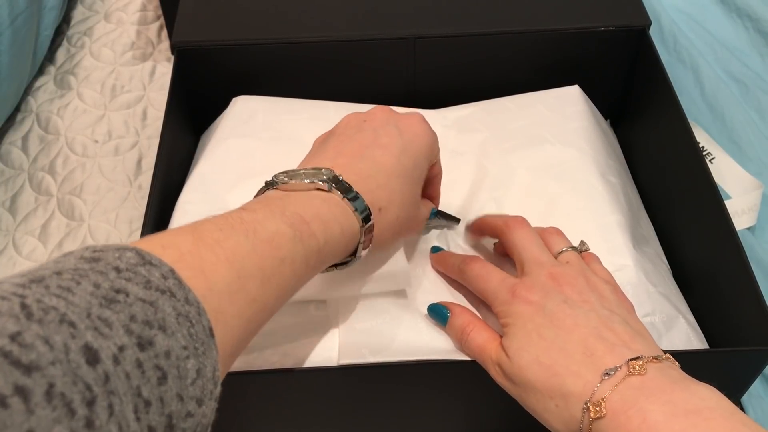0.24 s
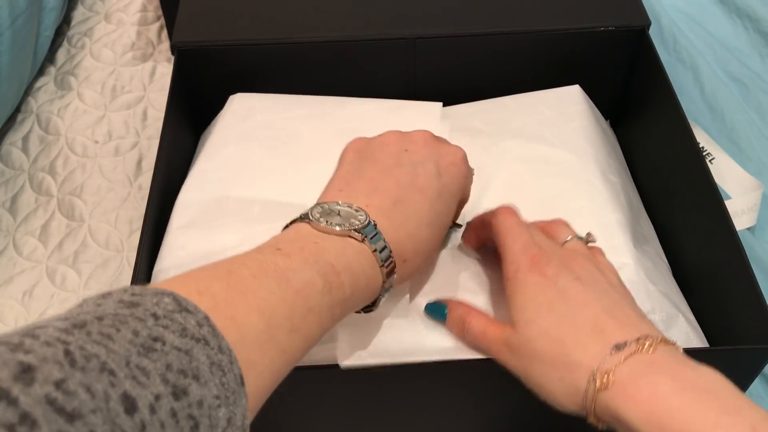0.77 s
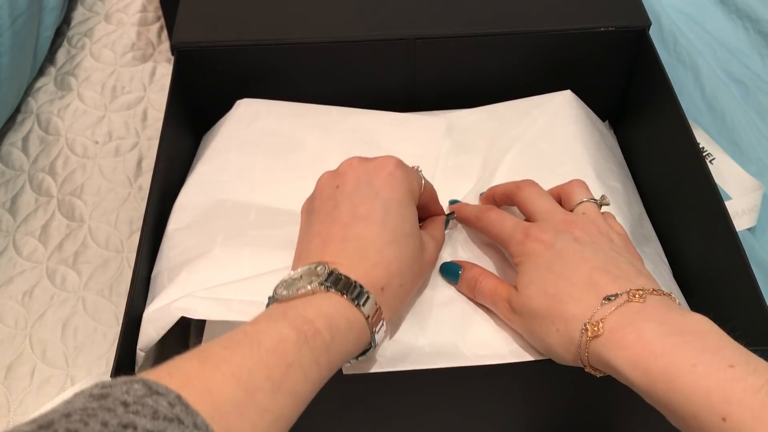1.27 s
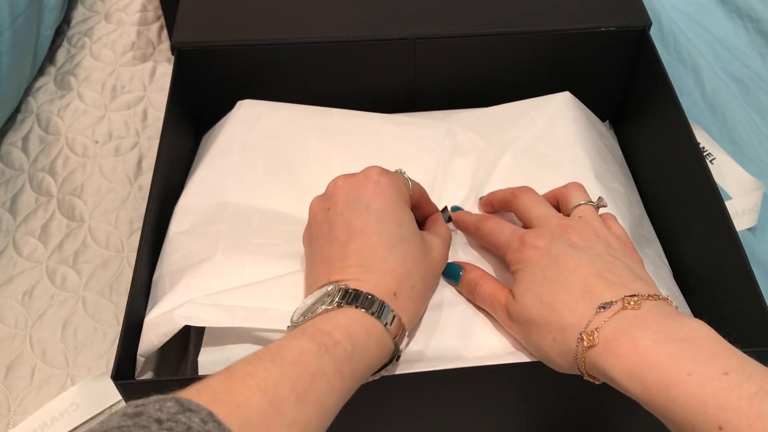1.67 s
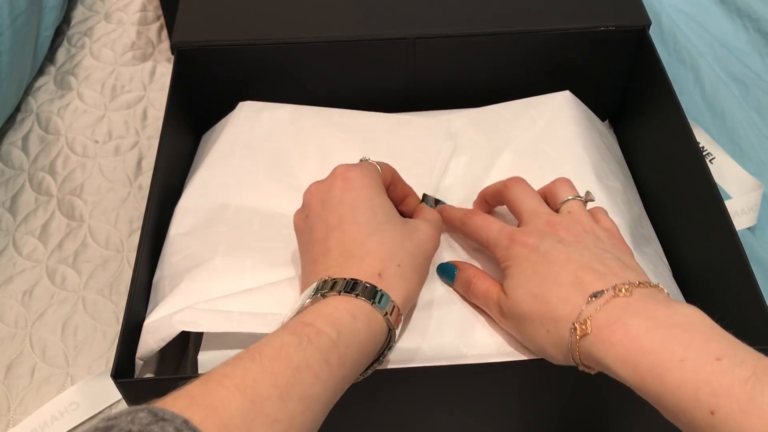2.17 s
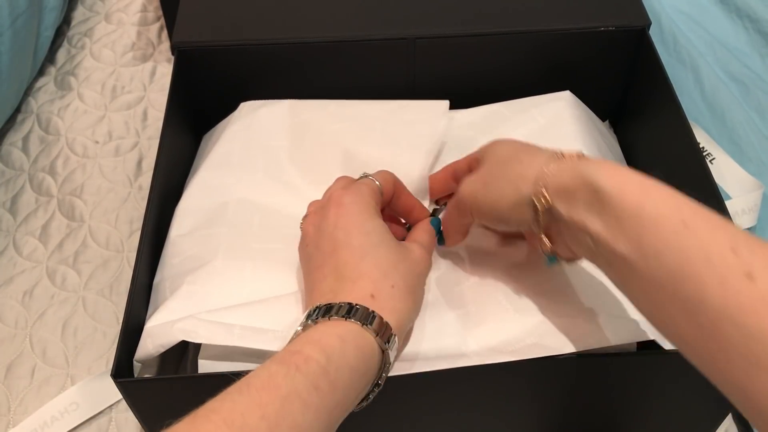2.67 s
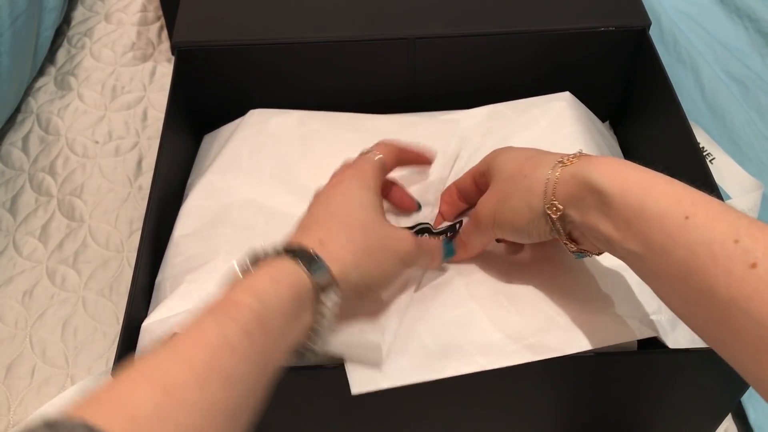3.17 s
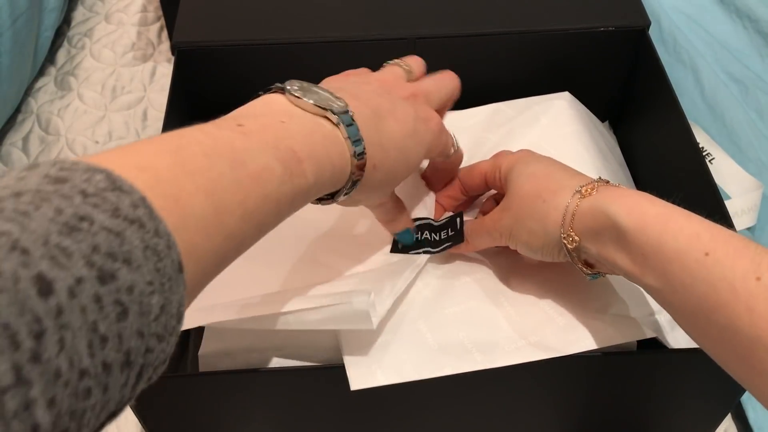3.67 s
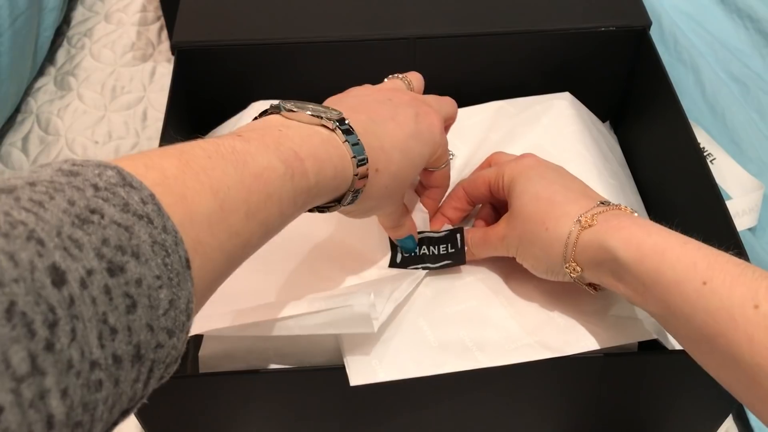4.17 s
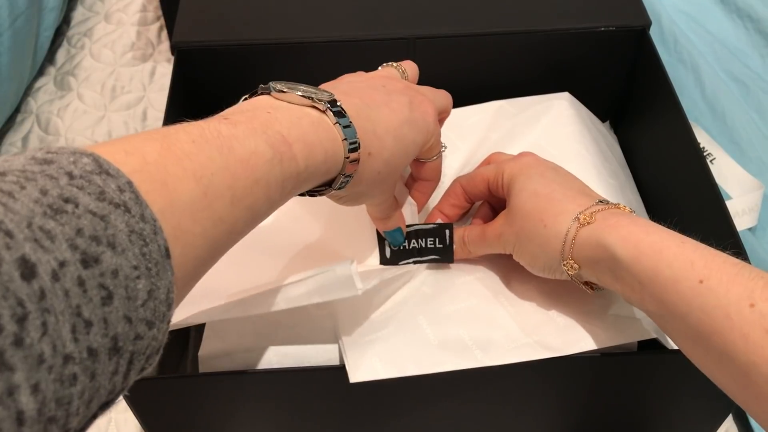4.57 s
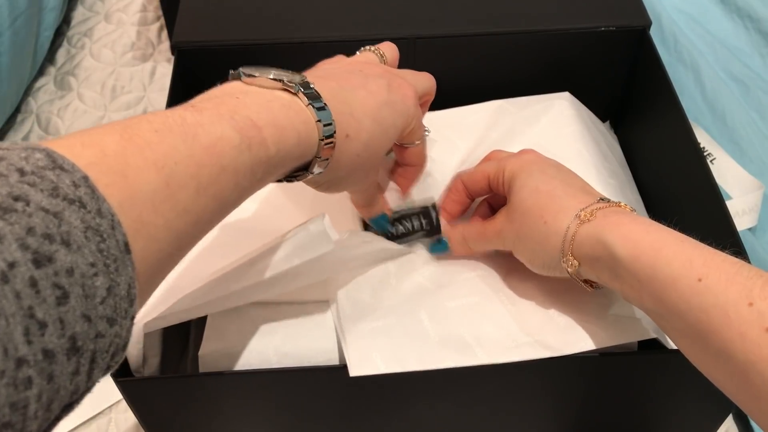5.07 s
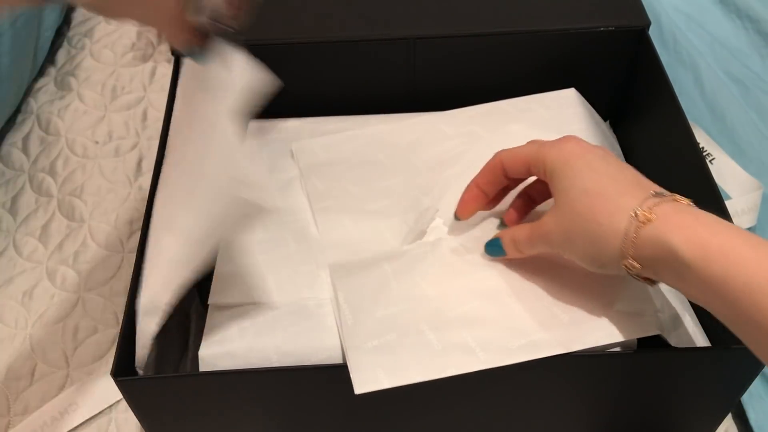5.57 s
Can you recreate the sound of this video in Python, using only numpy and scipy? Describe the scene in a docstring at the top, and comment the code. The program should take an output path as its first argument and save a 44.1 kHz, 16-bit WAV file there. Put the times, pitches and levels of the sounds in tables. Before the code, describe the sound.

Hands pick at a sticker on tissue paper: irregular crisp crinkles, tiny ticks and louder snaps over a faint papery slide. Soft dull nudges sound the box underneath. Activity rises and falls, thins around four and a half seconds, then swells in a quick peel and fold, with a faint low sinking hum at the end. Close microphone, soft small room, low air noise.

```python
"""Thin tissue paper crackles as hands peel a sticker off it in a cardboard box and fold the sheet back.
Small creases are thousands of tiny noise puffs over a smooth slide; large ones are loud snaps,
some short and sharp, some longer like several creases close together.
Soft pushes on the box are longer puffs that ring the cardboard, and a low sine sinks at the end.
Faint coloured noise is the air of the soft room, and short tails of fading noise are its echo."""
import sys
import numpy as np
from scipy import signal
from scipy.fft import rfft, irfft, next_fast_len
from scipy.io import wavfile
from scipy.ndimage import uniform_filter1d, map_coordinates

SR = 44100
rng = np.random.default_rng(int(sys.argv[2]) if len(sys.argv) > 2 else 0)


def unload_audio(sound):
    """Save the sound as a 16-bit wav file, at the path given as the first command line argument."""
    columns = np.transpose(np.atleast_2d(sound))
    # keep every value between -1 and 1, then stretch to whole-number steps
    steps = np.round(np.clip(columns, -1, 1) * 32767)
    wavfile.write(sys.argv[1], SR, steps.astype(np.int16))


N = 257103

# tone colour of the crisp part of the paper sound: f/Hz, relative level/dB
CRISP_COLOUR = [(1500, -20.5), (2500, -14.5), (3000, -4.5), (4200, -1), (4850, -7.5), (5350, 0),
                (6100, 0.5), (7700, -2.5), (8600, 0), (10400, -5.5), (12700, -0.5), (13900, -5),
                (17500, -4.5)]
# tone colour of the dull part, from larger folds: f/Hz, relative level/dB
DULL_COLOUR = [(60, -29.5), (250, -5), (420, -8), (700, -13), (1000, -4), (1500, -1.5), (2400, -1),
               (3200, -5.5), (5000, -14)]


def amp(db):
    """Turn decibels into a plain amplitude factor."""
    return 10 ** (np.asarray(db) / 20)


def unit(x):
    """Scale a sound to an average strength (rms) of 1."""
    return x / np.sqrt(np.mean(x ** 2) + 1e-20)


def along(points, hz):
    """Read a curve of (Hz, value) points, joined by straight lines on a log pitch axis."""
    f, value = np.transpose(points)
    return np.interp(np.log(hz + 1), np.log(f + 1), value)


def curves(rows):
    """Draw each column after the time as a curve with one value per sample."""
    times, *columns = np.transpose(rows)
    t = np.arange(N) / SR
    return [np.interp(t, times, column) for column in columns]


def wobble(rate):
    """A smooth random curve through `rate` random points a second."""
    knots = rng.standard_normal(int(N * rate / SR) + 4)
    return map_coordinates(knots, [np.arange(N) * rate / SR])


def filtered(x, response):
    """Multiply the spectrum of x by a response that depends on frequency."""
    size = next_fast_len(N + SR // 2)
    spectrum = rfft(x, size) * response(np.fft.rfftfreq(size, 1 / SR))
    return irfft(spectrum, size)[..., :N]


def coloured(x, points, size=2048):
    """Give x a tone colour with a filter that never sounds early; white noise keeps its power."""
    level = amp(along(points, np.fft.rfftfreq(size, 1 / SR)))
    # folding the cepstrum (the transform of the log spectrum) puts the filter's energy at its start
    cepstrum = irfft(np.log(level + 1e-3))
    cepstrum[1:size // 2] *= 2
    cepstrum[size // 2 + 1:] = 0
    pulse = irfft(np.exp(rfft(cepstrum)))
    return signal.fftconvolve(x, pulse / np.linalg.norm(pulse))[:N]


def bursts(times, gains, swell_s, ring_hz, ring_db, size):
    """Each burst is a puff of noise that swells, dies and favours the pitch of its own spot."""
    u = np.arange(size) / SR / swell_s[:, None]
    puff = rng.standard_normal(u.shape) * u * np.exp(-u)
    f, centre = np.fft.rfftfreq(size, 1 / SR), ring_hz[:, None]
    ring = 1j * f * 0.19 * centre / (centre ** 2 - f ** 2 + 1j * f * 0.25 * centre)
    puff = irfft(rfft(puff) * (1 + amp(ring_db) * ring), size)
    puff *= (gains / np.linalg.norm(puff, axis=1))[:, None]
    at = np.round(times * SR).astype(int)[:, None] + np.arange(size)
    return np.bincount(at.ravel(), puff.ravel(), N + SR)[:N]  # add up overlapping puffs


def handling():
    """Crisp and dull crackle levels: a steady rustle plus tugs that swell, hold and let go."""
    # the sheet's rustle between tugs: t/s, crisp level/dB, dull level against crisp/dB
    rustle = [(0.0, -37.5, -9.5), (0.19, -58.5, -5), (0.29, -51, -6), (0.56, -42, -12), (0.7, -51.5, -9.5),
              (0.8, -44.5, -9), (1.0, -44, -8), (1.28, -48, -7.5), (1.6, -44, -7.5), (1.85, -50, -5),
              (2.05, -66, -14), (2.45, -45, -4), (3.05, -44, -8), (3.68, -47, -4), (4.0, -47.5, -4),
              (4.5, -46, -6), (4.56, -56, -6), (4.68, -54.5, -6), (4.85, -50.5, -10), (5.1, -51, -17),
              (5.36, -45.5, -6.5), (5.83, -50, -12)]
    # hand tugs: t of full strength/s, time held/s, crisp level/dB, dull level against crisp/dB
    tugs = [(0.054, 0.03, -26.5, -11), (0.33, 0.017, -40.5, -7.5), (0.419, 0.057, -41.5, -9),
            (0.6, 0.012, -41, -8), (0.875, 0.014, -43, -8), (1.025, 0.041, -30, -10.5),
            (1.1, 0.023, -37.5, -8.5), (1.17, 0.047, -41.5, -9.5), (1.48, 0.047, -47, -10),
            (1.947, 0.015, -30.5, -10.5), (2.092, 0.091, -38, -12), (2.229, 0.14, -40, -8.5),
            (2.55, 0.018, -35, -9.5), (2.6, 0.22, -39.5, -6.5), (2.96, 0.03, -39.5, -5.5),
            (3.12, 0.098, -36, -6), (3.311, 0.057, -38.5, -7.5), (3.489, 0.016, -39, -6.5),
            (3.732, 0.11, -41, -2.5), (4.05, 0.013, -34.5, -6.5), (4.72, 0.062, -43.5, -7),
            (4.929, 0.0034, -44.5, -9), (4.98, 0.051, -47, -8), (5.174, 0.035, -29.5, -8.5),
            (5.278, 0.0059, -34, -8), (5.39, 0.065, -38, -8.5), (5.58, 0.045, -45, -9.5),
            (5.77, 0.046, -47.5, -14)]
    rise_db_per_s, fall_db_per_s = 468, 298
    t = np.arange(N) / SR
    rest_db, share_db = curves(rustle)
    crisp_power = amp(rest_db) ** 2
    dull_power = amp(rest_db + share_db) ** 2
    for full_s, held_s, db, tug_share_db in tugs:
        before_s = np.clip(full_s - t, 0, 1)
        after_s = np.clip(t - full_s - held_s, 0, 1)
        below_db = rise_db_per_s * before_s + fall_db_per_s * after_s
        power = amp(db - below_db) ** 2
        crisp_power = crisp_power + power
        dull_power = dull_power + amp(tug_share_db) ** 2 * power
    return np.sqrt(crisp_power), np.sqrt(dull_power)


def steady(x, seconds):
    """Even out the strength of x to about 1 over each short stretch, as if fed by a steady hand."""
    power = uniform_filter1d(x ** 2, int(seconds * SR))
    return x / np.sqrt(np.abs(power) + 1e-9)


def crackle(count=6000):
    """Many small creases buckle in clumps, unequal in size, pitch and length, as sheet slides on sheet."""
    # smooth slide against crackle, before clumping and a lift of the dull part: t/s, level/dB
    sliding = [(0, -4), (1.3, -3.5), (4.1, -7), (5.12, -16), (5.2, 0.5)]
    top_from_hz, bright_db, top_fade_power = 7500, -40.5, 0.35
    crisp_gain, dull_gain = handling()

    when, size, life, tilt, pitch = rng.random((count, 5)).T
    times = when * (N - 1) / SR
    clump_db = 3 * wobble(30) + 3 * wobble(110)
    # many small creases, few large ones
    size_db = clump_db[(times * SR).astype(int)] - 3.06 * np.log(1.006 - size)
    tilt_db = 12 * (tilt - 0.5)  # makes each crease more crisp or more dull
    swell_s = 0.00022 + 0.00053 * life ** 2
    crisp_hz, dull_hz = 3300 * 4.5 ** pitch, 900 * 3.5 ** pitch
    crisp = bursts(times, amp(size_db - tilt_db), swell_s, crisp_hz, ring_db=9, size=320)
    dull = bursts(times, amp(size_db + tilt_db), swell_s + 0.00047, dull_hz, ring_db=6.5, size=480)

    slide_gain = amp(curves(sliding)[0] + 0.41 * clump_db)
    crisp_slide, dull_slide = slide_gain * rng.standard_normal((2, N))
    crisp = steady(coloured(unit(crisp) + crisp_slide, CRISP_COLOUR), 0.067)
    dull = steady(coloured(unit(dull) + 1.7 * dull_slide, DULL_COLOUR), 0.05)

    # crackle softer than bright_db loses its top faster than its level
    top = filtered(crisp, lambda hz: 1 / (1 + (top_from_hz / (hz + 1)) ** 4))
    top_kept = np.minimum(crisp_gain / amp(bright_db), 1) ** top_fade_power
    crisp = crisp - top * (1 - top_kept)
    return crisp_gain * crisp + dull_gain * dull


def air():
    """The quiet room: coloured noise with a slightly unsteady level."""
    # tone colour of the room's air: f/Hz, relative level/dB
    air_colour = [(24, -34), (45, 0.5), (250, -2), (450, -8.5), (800, -11.5), (3000, -18.5), (17000, -59)]
    level = amp(-61 + 2.2 * wobble(9.8))
    return level * coloured(rng.standard_normal(N), air_colour)


def room(x, size=SR // 4):
    """Bedding and walls answer briefly, treble dying first; each quarter second gets a new random echo."""
    # how long the echo takes to fall by 60 dB: f/Hz, time/s
    decay = [(300, 0.25), (3000, 0.16), (15000, 0.02)]
    delay = 120  # samples before the echo starts
    out = np.zeros(N + 2 * SR)
    for start in range(0, N, size):
        hz, t, noise = signal.stft(rng.standard_normal(SR // 3), SR, nperseg=256)
        fade = amp(-60 * t / along(decay, hz)[:, None])
        tail = signal.istft(noise * fade, SR, nperseg=256)[1]
        answer = signal.fftconvolve(x[start:start + size], tail / np.linalg.norm(tail))
        out[start + delay:][:len(answer)] += answer
    return out[:N]


def box():
    """Fingers and sheet push softly on the box: puffs of noise ring the cardboard briefly."""
    # pushes: t/s, level before a lift of 28 dB/dB, pitch of the pushed spot f/Hz
    nudges = [(0.053, -42, 390), (0.596, -35.5, 213), (0.748, -44.5, 260), (1.029, -42.5, 355),
              (1.944, -41, 373), (2.101, -45.5, 250), (2.371, -41.5, 223), (3.198, -37.5, 325),
              (3.86, -40.5, 366), (4.031, -45, 363), (4.786, -46, 284), (5.177, -34, 251),
              (5.269, -45, 336)]
    # ringing of the cardboard: f/Hz, width/Hz, level/dB
    card_rings = [(93, 92, 7), (234, 200, -1)]
    times, db, spot_hz = np.transpose(nudges)
    swell_s = np.full(len(times), 0.004)
    pushes = bursts(times, amp(db + 28), swell_s, spot_hz, ring_db=8.5, size=2000)

    def cardboard(f):
        """Add up the cardboard's resonances, each strongest at its own pitch."""
        return sum(amp(db) * 1j * f * width / (centre ** 2 - f ** 2 + 1j * f * width)
                   for centre, width, db in card_rings)

    return filtered(pushes, cardboard)


def snaps():
    """Loud snaps, short and sharp or longer like several creases close together: crisp puff, dull pop."""
    # loud snaps: t/s, crisp level/dB, dull level against crisp/dB, favoured f/Hz, length (a plain number)
    loud_snaps = [(0.1672, -17, -13, 6900, 0.84), (0.24, -22.5, -11, 5900, 1.4),
                  (0.452, -16, -17, 14600, 2.6), (0.462, -12.5, -27, 12000, 0.94),
                  (0.5822, -10, -11.5, 7440, 0.6), (0.602, -9.5, -3, 6950, 6),
                  (0.609, -1.5, -29, 14500, 2.6), (0.659, -12, -25, 12600, 0.65),
                  (0.67, -11.5, -30, 7550, 1.9), (0.7096, -19, -34, 16400, 0.65),
                  (0.7812, -15, -21, 13400, 0.49), (0.8745, -11, -15, 5900, 6.3),
                  (0.9437, -8.5, -16, 13100, 2.5), (0.968, -9.5, -18, 9050, 3.3),
                  (0.988, -10.5, -26, 8700, 2.5), (1.0287, 0, -28, 12300, 2.3),
                  (1.1952, -7, -19, 8900, 0.81), (1.3384, -18.5, -5, 4830, 1.3),
                  (1.38, -14, -24, 11800, 1.1), (1.474, -13, -8, 8900, 3.4),
                  (1.4837, -6.5, -20, 4650, 0.69), (1.506, -16, -11, 7900, 1),
                  (1.533, -15.5, -8, 9100, 0.4), (1.565, -17, -12, 8600, 1.9), (1.589, -17, -21, 7400, 3.4),
                  (1.641, -15.5, -6, 9200, 1.8), (1.653, -12, -7, 4200, 0.67), (1.983, -12, -8, 6600, 2.6),
                  (1.9947, -6, -13, 8900, 1.6), (2.0825, -5, -15, 12900, 1.6), (2.1091, -5.5, -11, 3980, 4),
                  (2.227, -7.5, -16, 12600, 1.2), (2.2498, -5, -21, 11700, 3),
                  (2.265, -7, -13, 13200, 0.32), (2.2894, -4, -23, 12400, 1.9),
                  (2.3327, -12, -4, 8800, 1.1), (2.358, -8.5, -16, 8700, 1.3),
                  (2.3812, -6.5, -26, 8750, 0.93), (2.4263, -17.5, -8, 6200, 0.39),
                  (2.5514, -6.5, -10, 7200, 0.18), (2.7078, -10, -16, 6300, 1.3),
                  (2.854, -12, -2, 3800, 1.8), (2.8625, -10.5, -0.5, 4100, 3.6),
                  (2.9194, -11.5, -1.5, 8570, 0.85), (2.98, -8, -7, 4600, 1.9),
                  (3.0858, -9.5, -7.5, 3600, 1.7), (3.0932, -12, -21, 8800, 0.59),
                  (3.205, -5.5, -12, 9500, 1), (3.3035, -14, -6.5, 3700, 0.71),
                  (3.3277, -12, -6, 3900, 2.9), (3.3695, -12, -14, 5200, 2.6), (3.544, -11, -16, 7650, 1.2),
                  (3.566, -10.5, -9.5, 7300, 2.9), (3.718, -7.5, -10, 3870, 1.5),
                  (3.737, -10, -0.5, 6000, 3.5), (3.8734, 2, -17.5, 8200, 0.59),
                  (3.8905, -8, -2.5, 7700, 0.92), (3.946, -11, -6, 6900, 2), (3.9709, -16, -12, 6500, 1.2),
                  (4.025, -13, -15, 5500, 1.9), (4.0753, -14, -1.5, 7500, 1.5),
                  (4.1904, -15.5, -5, 8900, 0.95), (4.2343, -11.5, -6.5, 11600, 1),
                  (4.2602, -7.5, -9, 15900, 0.35), (4.376, -11.5, -10, 6250, 0.46),
                  (4.407, -19, -10, 6700, 0.9), (4.4223, -18, -20, 8700, 1.6),
                  (4.4391, -13.5, -14, 12800, 1.4), (4.4914, -14, -5, 7300, 1.1),
                  (4.5065, -7.5, -15, 6700, 0.57), (4.53, -6.5, -8.5, 8560, 1.2),
                  (4.5462, -16.5, -21, 5800, 0.94), (4.6935, -15, -8, 6450, 1.3),
                  (4.7414, -14, -17, 6100, 0.79), (4.7975, -10, -10.5, 6300, 2.3),
                  (4.8685, -18.5, -20, 7750, 0.49), (4.9307, -7, -10, 6200, 1.6),
                  (4.9739, -15, -3, 8150, 2.9), (5.129, -12, -31, 6600, 0.83),
                  (5.1735, -9.5, -4, 6300, 0.67), (5.3366, -5.5, -11, 13400, 2.8),
                  (5.393, -12, -11, 12200, 1.7), (5.4417, -5.5, -9.5, 8700, 2.2),
                  (5.6423, -12, -16, 10500, 5), (5.686, -14, -25, 14000, 0.73),
                  (5.7729, -15.5, -21, 9700, 1.5)]
    times, db, dull_db, crisp_hz, length = np.transpose(loud_snaps)
    fold_hz = 1700 * np.exp(0.51 * rng.standard_normal(len(times)))
    crisp_swell_s = 0.00053 * length
    dull_swell_s = 0.00028 * length + 0.00064
    crisp = bursts(times, amp(db), crisp_swell_s, crisp_hz, ring_db=6.0, size=800)
    dull = bursts(times, amp(db + dull_db), dull_swell_s, fold_hz, ring_db=1.5, size=1200)
    return coloured(crisp, CRISP_COLOUR) + coloured(dull, DULL_COLOUR)


def hum():
    """A soft low sine swells near the end while its pitch sinks ever faster."""
    start_s, swell_s = 5.57, 0.06
    start_hz, sag_hz_per_s2 = 155, 310
    start_db, growth_db_per_s = -63, 15
    u = np.clip(np.arange(N) / SR - start_s, 0, 1)  # seconds since the hum began
    hz = start_hz - sag_hz_per_s2 * u ** 2
    fade_in = np.clip(u / swell_s, 0, 1)
    level = amp(start_db + growth_db_per_s * u + 0.83 * wobble(11.9))
    tone = np.sqrt(2) * np.sin(2 * np.pi * np.cumsum(hz) / SR)  # rms of 1
    return fade_in * level * tone


def scene():
    """Mix the paper and box with their room echo, the hum and the air."""
    near = crackle() + box() + snaps()
    echo = amp(-14.5) * room(near)
    return (near + echo + hum() + air())[None]


def record(dry):
    """Keep nothing above the band limit; the last 120 Hz below it fade out."""
    top_hz = 17230
    return filtered(dry, lambda hz: np.clip((top_hz - hz) / 120, 0, 1))


dry = scene()
out = record(dry)
unload_audio(out)
```